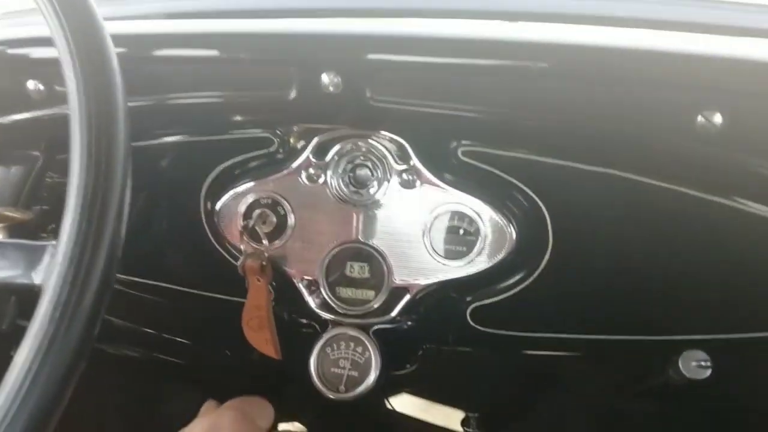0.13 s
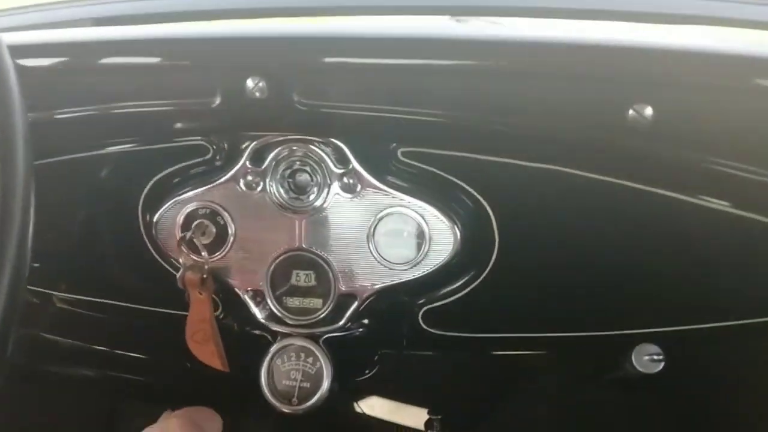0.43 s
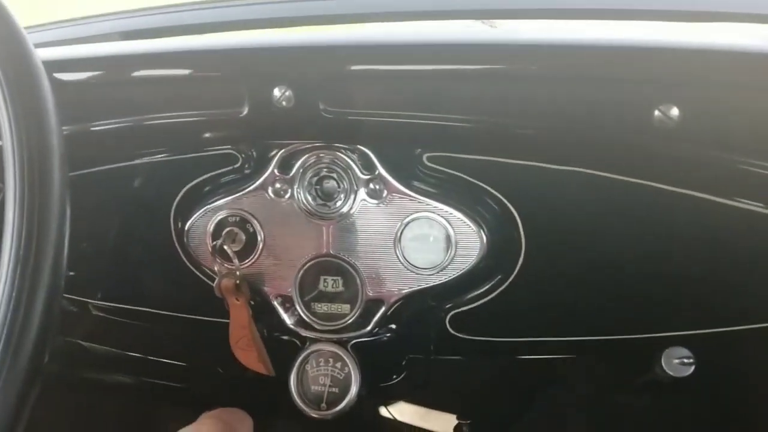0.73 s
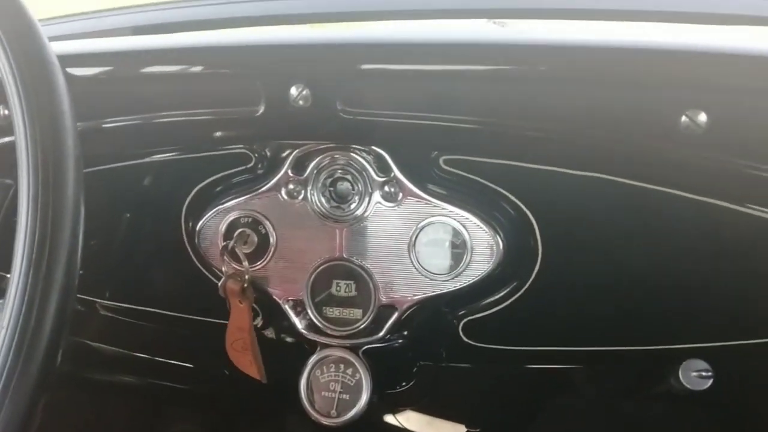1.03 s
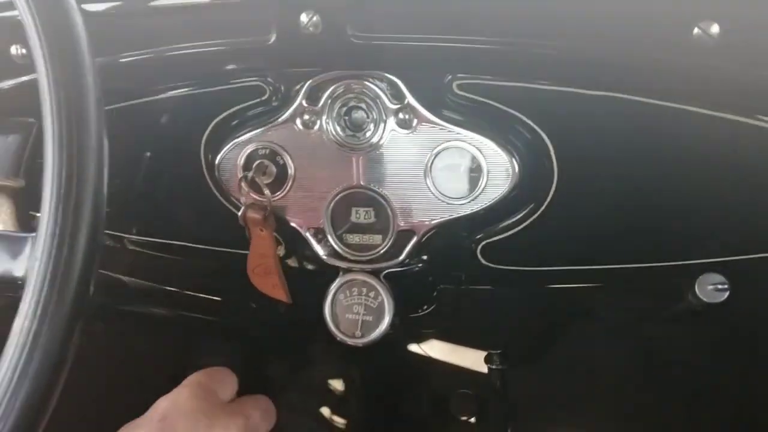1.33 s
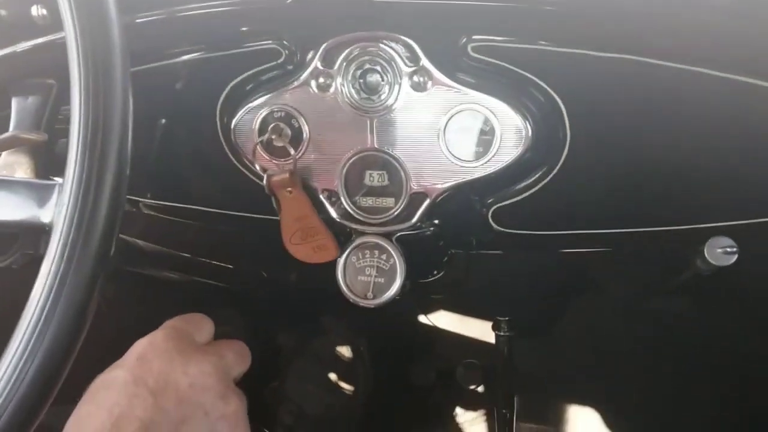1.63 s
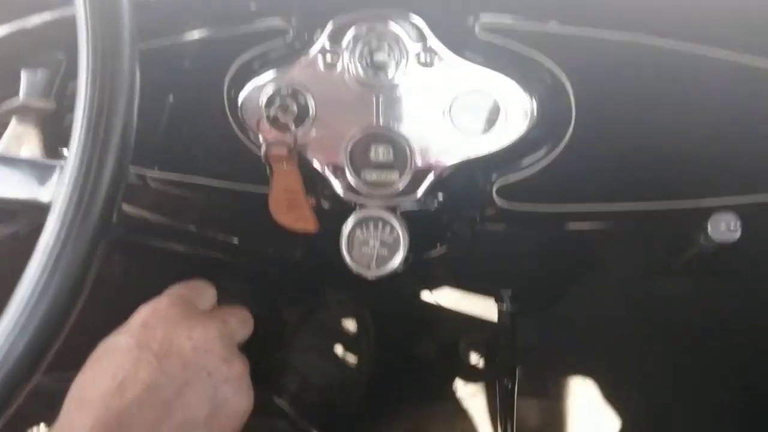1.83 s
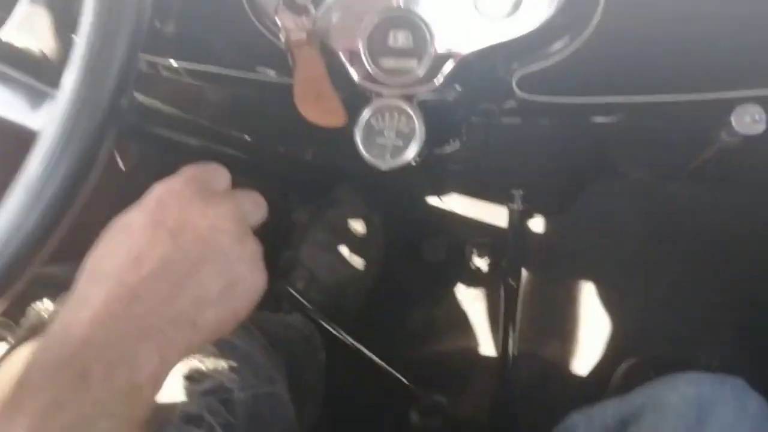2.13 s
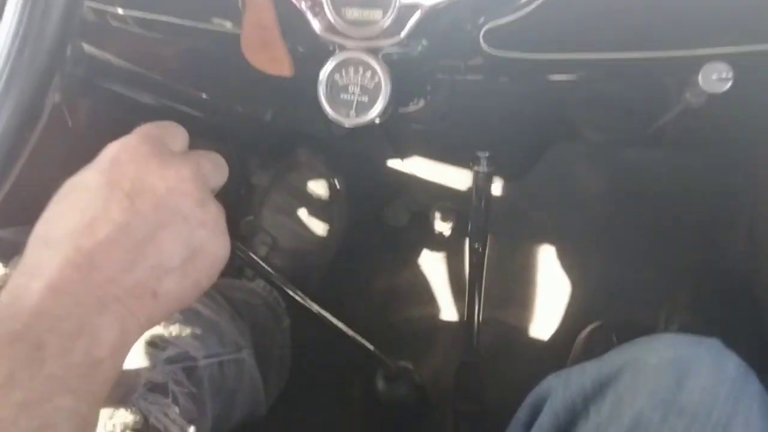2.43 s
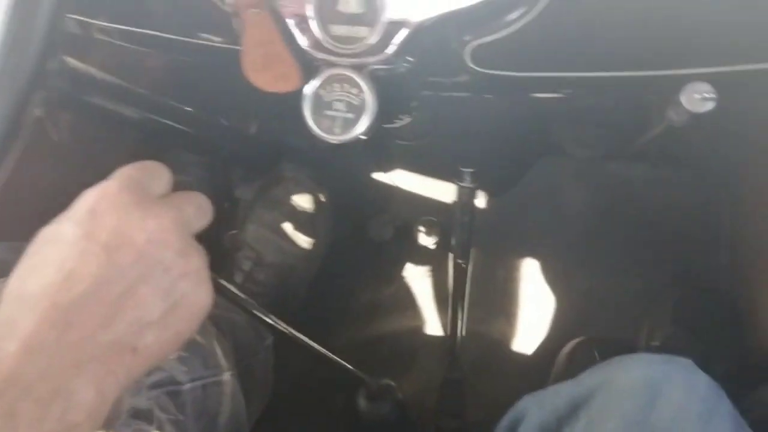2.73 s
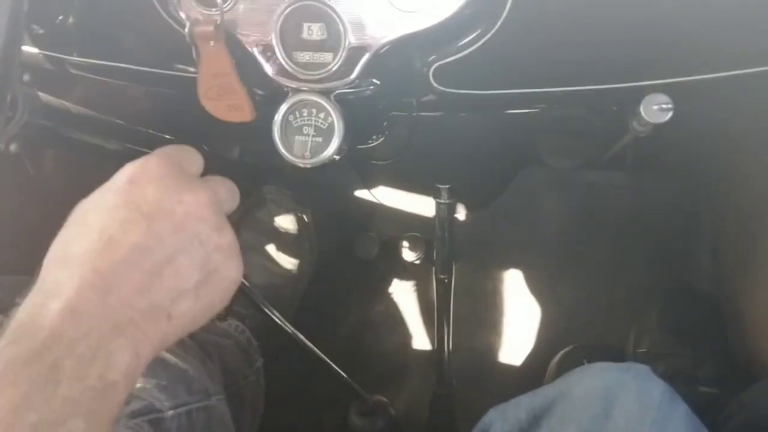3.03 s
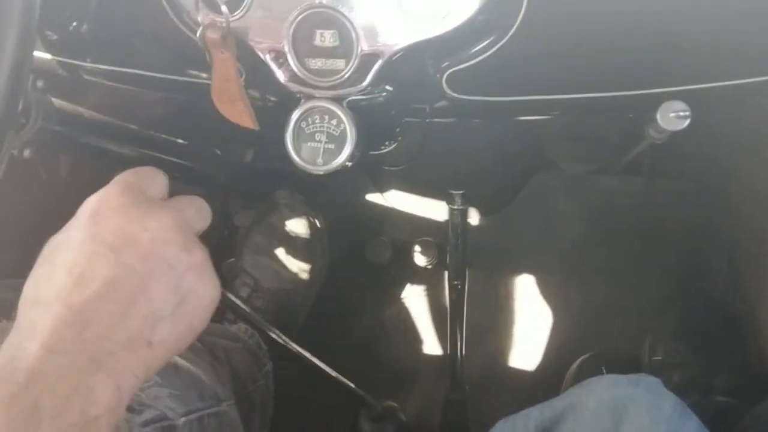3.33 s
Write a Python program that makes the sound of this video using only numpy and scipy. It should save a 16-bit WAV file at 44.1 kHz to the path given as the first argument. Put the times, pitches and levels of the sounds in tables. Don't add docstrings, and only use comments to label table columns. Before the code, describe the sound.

Old car gearbox grinds harshly in short bursts over a low, throbbing engine idle inside the cabin

```python
import sys
import numpy as np
from scipy import signal
from scipy.fft import rfft, irfft, next_fast_len
from scipy.io import wavfile
from scipy.ndimage import uniform_filter1d

SR = 44100
rng = np.random.default_rng(int(sys.argv[2]) if len(sys.argv) > 2 else 0)


def magnitude_from_level(level_db):
    exponent = np.asarray(level_db, float) / 20
    return 10 ** exponent


def generate_wav(sig):
    pcm = np.round(np.clip(np.atleast_2d(sig).T, -1, 1) * 32767).astype(np.int16)
    wavfile.write(sys.argv[1], SR, pcm)


N = 153468


def rms_one(x):
    return x / np.sqrt(np.mean(x ** 2) + 1e-20)


def read_curve(points, hz):
    f, value = np.transpose(points)
    return np.interp(np.log(hz + 1), np.log(f + 1), value)


def colour(x, points):
    n = x.shape[-1]
    size = next_fast_len(n + 4096)
    gain = magnitude_from_level(read_curve(points, np.fft.rfftfreq(size, 1 / SR)))
    return irfft(rfft(x, size) * gain, size)[..., :n]


def slow_chance(per_s, count):
    hz = np.arange(400) * SR / N
    z = rng.standard_normal((count, 400, 2)) @ [1, 1j] / (1 + (hz / per_s) ** 4)
    z[:, 0] = 0
    x = irfft(z, N)
    return x / x.std(1, keepdims=True)


def resonate(x, modes, wander_db):
    swell = magnitude_from_level(wander_db * slow_chance(per_s=25, count=len(modes))[:, :x.shape[-1]])
    out = 0
    for k, (hz, width_hz, db) in enumerate(modes):
        mode = signal.lfilter(*signal.iirpeak(hz, hz / width_hz, SR), x)
        out = out + (-1) ** k * magnitude_from_level(db) * swell[k] * mode
    return out


# hz, correlation
PORT_LIKENESS = [(30, 0.98), (150, 0.77), (400, 0.8), (900, 0.27), (1400, -0.14), (3000, -0.047)]


def wash(points, patchy_db, size):
    frames, hz = 4 * N // size + 5, np.fft.rfftfreq(size, 1 / SR)
    a, b, c, d, patches = rng.standard_normal((frames, len(hz), 5)).T
    patches = uniform_filter1d(patches, size=10, axis=0)
    patches = rms_one(uniform_filter1d(patches, size=10, axis=1))
    same = np.clip(read_curve(PORT_LIKENESS, hz), -1, 1)[:, None]
    left = a + 1j * b
    right = same * left + np.sqrt(1 - same ** 2) * (c + 1j * d)
    z = np.array([left, right]) * magnitude_from_level(read_curve(points, hz)[:, None] + patchy_db * patches)
    return rms_one(signal.istft(z, nperseg=size, noverlap=size * 3 // 4)[1][:, :N])


# start_s, firing_hz, boom_db, upper_orders_db
IDLE = [(0.0, 22.2, -54, -58), (0.06, 22.59, -28.5, -25.5), (0.78, 22.92, -19.5, -21),
        (0.9, 23.99, -16.5, -20), (1.67, 23.69, -12, -20), (1.84, 23.26, -24.5, -22.5),
        (2.04, 23.58, -12.5, -16.5), (2.21, 22.91, -25, -25.5), (2.53, 24.31, -19.5, -16),
        (2.71, 23.52, -30, -18.5), (3.01, 23.62, -16, -20.5), (3.48, 23.88, -18, -23.5)]
# multiple_of_firing, level_db
ORDERS = [(.5, -23), (1.5, -33), (2, -9), (2.5, -29.5), (3, -3.5), (3.5, -22), (4, -4), (5, -22.5),
          (6, -23), (7.5, -12.5), (8, -12.5), (9, -21)]
# hz, level_db_per_hz
RUMBLE = [(4, -25), (16, 5.5), (42, 0.5), (68, 4.5), (130, -11.5), (185, -9), (240, -12.5), (520, -38.5)]
# hz, level_db_per_hz
CLATTER = [(450, 7.5), (620, -5.5), (800, 3.5), (1400, -4.5), (2000, -2), (3000, -13), (4800, -56),
           (16000, -72)]


def engine():
    wander_db, wander_rad, wander_per_s, lag_samples = 2.2, 0.45, 4, 12
    s, hz, boom_db, upper_db = np.transpose(IDLE)
    t = np.arange(N) / SR
    turns = np.cumsum(np.interp(t, s, hz)) / SR
    k, db = np.transpose(ORDERS)[:, :, None]
    level = slow_chance(wander_per_s, count=len(k))
    phase = slow_chance(wander_per_s, count=len(k))
    orders = magnitude_from_level(db + wander_db * level) * np.cos(2 * np.pi * k * turns + wander_rad * phase)
    upper = magnitude_from_level(np.interp(t, s, upper_db)) * orders.sum(0)
    boom = np.sqrt(2) * magnitude_from_level(np.interp(t, s, boom_db)) * np.cos(2 * np.pi * turns)
    tones = boom + upper
    tones = np.array([tones, 0.85 * np.roll(tones, -lag_samples)])
    beat = np.cos(2 * np.pi * turns + 1.76 * phase[0])
    rumble = magnitude_from_level(-19) * wash(RUMBLE, patchy_db=2.5, size=2048) * (1 + 0.13 * beat)
    flicker = magnitude_from_level(0.78 * slow_chance(per_s=26, count=1))
    clatter = magnitude_from_level(-34) * wash(CLATTER, patchy_db=0.5, size=512) * (1 + 0.072 * beat) * flicker
    return tones + rumble + clatter


# hz, level_db_per_hz
SCRAPE = [(90, -10), (430, 3.5), (620, -3.5), (1100, 0), (2500, -6), (4300, -15), (6800, -14), (16000, -24)]
# hz, level_db
PAN = [(100, 3.5), (250, 2), (450, -6), (560, -11), (640, -50), (780, -4), (1000, -22)]


def grind(press, teeth, case):
    clash_s, jitter, sag_per_s, apart, puff_floor = 0.00061, 0.057, 0.15, 0.38, 0.098
    s, db = np.transpose(press)
    clash_hz, rough, thud_db, case_db, tilt_db = teeth
    rough, at = np.clip(rough, 0, 1), round(s[0] * SR)
    t = np.arange(at, round(s[-1] * SR)) / SR
    uneven, strength, middle, side = rng.standard_normal((4, N // 8))[:, :len(t)]

    hz = clash_hz * (1 - sag_per_s * (t - t.mean()))
    uneven = rms_one(uniform_filter1d(uneven, size=150))
    turns = np.cumsum(hz * (1 + jitter * uneven)) / SR
    clicks = np.diff(np.floor(turns), prepend=0) * magnitude_from_level(2.5 * strength)
    since_clash_s = (turns % 1) / hz
    puffs = puff_floor + np.exp(-since_clash_s / clash_s)
    puffs = puffs * (middle + apart * side * np.array([[1], [-1]]))
    puffs = puffs * magnitude_from_level(2 * strength[turns.astype(int)])
    drive = (1 - rough) * rms_one(clicks) + rough * rms_one(puffs)

    ring = magnitude_from_level(case_db) * rms_one(resonate(drive, case, wander_db=2))
    bright = rms_one(colour(drive, SCRAPE)) + ring
    bright = rms_one(colour(bright, [(250, -2 * tilt_db), (16000, 4 * tilt_db)]))
    thud = 0
    for k in range(1, 9):
        level = magnitude_from_level(thud_db + read_curve(PAN, k * clash_hz))
        thud = thud + level * np.cos(2 * np.pi * k * np.cumsum(hz) / SR + k * k)
    edge = np.clip(np.minimum(t - s[0], s[-1] - t) / 0.0013, 0, 1)
    gain = magnitude_from_level(np.interp(t, s, db)) * edge
    out = np.zeros((2, 2, N))
    out[0, :, at:at + len(t)] = gain * bright
    out[1, :, at:at + len(t)] = gain * (thud + magnitude_from_level(-8) * ring)
    return out


# start_s, level_db
PRESS = [
    [(.47, -29), (.481, -24.5), (.495, -21), (.508, -15.5), (.54, -15), (.592, -18.5), (.625, -29),
     (.648, -44)],
    [(.695, -32), (.712, -29), (.74, -39), (.755, -15.5), (.767, -25), (.812, -27.5), (.828, -32.5),
     (.838, -24.5), (.87, -42)],
    [(2.462, -65), (2.481, -27), (2.497, -22.5), (2.508, -13.5), (2.546, -9.5), (2.574, -16.5),
     (2.582, -16.5), (2.6, -42)],
    [(2.59, -25), (2.62, -21), (2.65, -22.5), (2.662, -31), (2.676, -15.5), (2.695, -23.5), (2.708, -21),
     (2.716, -22.5), (2.73, -35)],
]
# clash_hz, irregular_share, thud_db, case_ring_db, brightness_db_per_octave
TEETH = [
    (273, 0.84, -14, -2.5, 1.8),
    (268.7, 0.95, -24, -2, 1.9),
    (110.16, 0.64, -14, -6.5, 1.8),
    (194.6, 0.98, -5.5, -10, 2.2),
]
# hz, width_hz, level_db
CASE_FIRST = [(430, 12, 2), (1100, 40, 6), (1285, 13, -14), (1767, 27, -2), (2108, 42, -6),
              (2330, 21, -5.5), (3040, 67, -44), (3210, 39, -14), (3600, 240, -21.5), (4100, 44, -11),
              (4307, 40, -17)]
CASE_SECOND = [(700, 39, -4), (1150, 50, 3.5), (1430, 22, -8), (1800, 31, -4), (2120, 40, -4),
               (2320, 27, -1), (3190, 36, -11.5), (3500, 170, -9.5), (4230, 130, -18), (4650, 34, -10)]
CASE_THIRD = [(441, 11, 3.5), (545, 17, -5), (775, 17, -15), (960, 22, -8), (1350, 40, -16),
              (1578, 28, -20), (2000, 22, -13), (2100, 50, -6.5), (2280, 35, -6), (2511, 35.3, -2.5),
              (2910, 71, -10), (3250, 33, -14), (3327, 77, -11), (3840, 74, -13.5)]
CASE_LAST = [(441, 28, 4.5), (782, 25, -4), (990, 29, -5), (1380, 30, -10), (1480, 23, -13), (2050, 35, 3),
             (2360, 31, -7), (2850, 35, -8), (3110, 79, -9), (3180, 76, -20), (4310, 170, -27)]


def gears():
    cases = [CASE_FIRST, CASE_SECOND, CASE_THIRD, CASE_LAST]
    return sum(grind(press, teeth, case) for press, teeth, case in zip(PRESS, TEETH, cases))


def rough_tones(table, rough_rad):
    out = np.zeros(N)
    for s, length_s, hz, db in table:
        t = np.arange(round(length_s * SR)) / SR
        stagger = rough_rad * np.cumsum(rng.standard_normal(4000))[:len(t)]
        tone = np.sqrt(np.sin(np.pi * t / length_s)) * np.sin(2 * np.pi * hz * t + stagger)
        out[round(s * SR):][:len(t)] += magnitude_from_level(db) * tone
    return out * np.array([[1], [.7]])


# start_s, length_s, pitch_hz, level_db
STRIKES = [(.502, 0.014, 1100, -17), (.533, 0.013, 1067, -21), (.565, 0.011, 1080, -23),
           (.585, 0.0053, 1100, -14), (.706, .014, 4130, -35), (.708, 0.012, 1117, -26),
           (.76, 0.0093, 3700, -33), (.762, .012, 7300, -30), (.764, 0.016, 1150, -31),
           (.806, 0.021, 1150, -30), (.834, 0.019, 1100, -26), (2.5, 0.014, 1390, -22),
           (2.508, 0.039, 775, -24), (2.524, 0.0081, 2330, -19), (2.534, 0.036, 2910, -37),
           (2.546, 0.028, 980, -16.5), (2.515, .045, 441, -19.5), (2.53, 0.039, 545, -24),
           (2.548, 0.015, 1715, -20), (2.61, 0.014, 441, -19.5), (2.612, .022, 1490, -24),
           (2.638, 0.018, 2940, -26), (2.665, 0.063, 783, -30), (2.699, .016, 1530, -21),
           (2.7, 0.012, 3100, -26)]


def strikes():
    return rough_tones(STRIKES, rough_rad=0.049)


# start_s, peak_db, ring_s, low_share
TICKS = [(0.947, -27.5, 0.04, 0.9), (1.369, -28, 0.032, 0.36), (1.4604, -28.5, 0.041, 0.6),
         (1.789, -30.5, 0.076, 0.22), (1.8638, -33.5, 0.25, 0.56), (1.9022, -29, 0.13, 0.51),
         (1.9741, -30, 0.058, 0.28), (2.171, -26, 0.04, 0.52), (2.2402, -25, 0.029, 0.6),
         (2.3008, -25, 0.038, 0.56), (2.3542, -17, 0.035, 0.4), (2.3838, -26.5, 0.058, 0.66),
         (2.4067, -25.5, 0.066, 0.46), (2.76, -24, 0.049, 0.52), (2.8358, -24, 0.045, 0.47),
         (2.9464, -23.5, 0.047, 0.7), (3.178, -26, 0.045, 0.52), (3.2487, -31.5, 0.053, 0.16)]
# hz, width_hz, level_db
LINK_MODES = [(922.7, 900, -10.5), (2040, 270, -1.5), (2420, 200, -16), (3320, 170, -6.5), (4560, 87, -4),
              (6760, 1800, -11), (9460, 700, -7.5)]


def ticks():
    level_db, rise_s, snap_db, snap_s, wander_db = 2, 0.0022, 14.5, 0.0056, 2.5
    out, t = np.zeros(N + 4000), np.arange(4000) / SR
    noise = rng.standard_normal((len(TICKS), len(t)))
    lows = resonate(noise.ravel(), LINK_MODES[:4], wander_db).reshape(noise.shape)
    highs = resonate(noise.ravel(), LINK_MODES[4:], wander_db).reshape(noise.shape)
    for (s, db, ring_s, low), hit, a, b in zip(TICKS, noise, lows, highs):
        low = np.clip(low, 0, 1)
        rattle = low * rms_one(a) + (1 - low) * rms_one(b)
        rattle = rattle * magnitude_from_level(-60 * t / max(ring_s, .01))
        snap = magnitude_from_level(snap_db - 60 * t / snap_s) * hit
        rise = np.minimum(t / rise_s, 1)
        out[round(s * SR):][:len(t)] += magnitude_from_level(level_db + db) * rise * (rattle + snap)
    return out[:N]


# start_s, length_s, pitch_hz, level_db
SQUEAKS = [
    (0.073, 0.0051, 865, -33),
    (0.146, 0.019, 2140, -35),
    (.148, 0.011, 3830, -37),
    (.168, 0.034, 2180, -42.5),
    (0.372, 0.02, 6340, -39),
    (.38, .018, 4930, -44),
    (3.121, 0.022, 2100, -40),
    (3.258, 0.021, 4552, -38),
]


def squeaks():
    return rough_tones(SQUEAKS, rough_rad=0.092)


def cabin(x):
    t60_s, shared_hz, direct, even = 0.092, 440, 0.25, 0.75
    t = np.arange(4096) / SR
    tail = rng.choice([-1., 1.], (2, len(t))) * (rng.random((2, len(t))) < .1) * magnitude_from_level(-60 * t / t60_s)
    tail /= np.linalg.norm(tail, axis=1, keepdims=True)
    tail[:, 0] += direct
    z = rfft(tail)
    z = z / uniform_filter1d(abs(z), size=5) ** even
    tail = irfft(z) * magnitude_from_level(-30 * t / t60_s)
    tail /= np.linalg.norm(tail, axis=1, keepdims=True)
    low = signal.sosfiltfilt(signal.butter(2, shared_hz, fs=SR, output="sos"), x)
    return low.mean(0) + signal.fftconvolve(x - low, tail, axes=1)[:, :N]


def scene():
    airborne, body_borne = gears()
    return engine() + body_borne + cabin(airborne + ticks()) + squeaks() + strikes()


def low_pass(x):
    return signal.sosfilt(signal.butter(12, 15900, fs=SR, output="sos"), x)


# hz, level_db
PORT_LEFT = [(20, 3.5), (4200, -0.5), (5300, -5), (7100, 7), (8300, -3.5), (9700, -21), (11500, -25),
             (16000, -18)]
PORT_RIGHT = [(20, 4.5), (4200, -1.5), (5500, -5.5), (7500, -6.5), (8600, -6.5), (9700, -2.5), (11500, -16),
              (16000, -23.5)]


def record(dry):
    knee = 0.93
    x = np.array([colour(dry[0], PORT_LEFT), colour(dry[1], PORT_RIGHT)])
    x = signal.lfilter(*signal.butter(1, 6.5, "high", fs=SR), x)
    over = np.maximum(abs(x) - knee, 0)
    size = np.minimum(abs(x), knee) + (1 - knee) * np.tanh(over / (1 - knee))
    return low_pass(np.sign(x) * size)


dry = scene()
out = record(dry)
generate_wav(out)
```